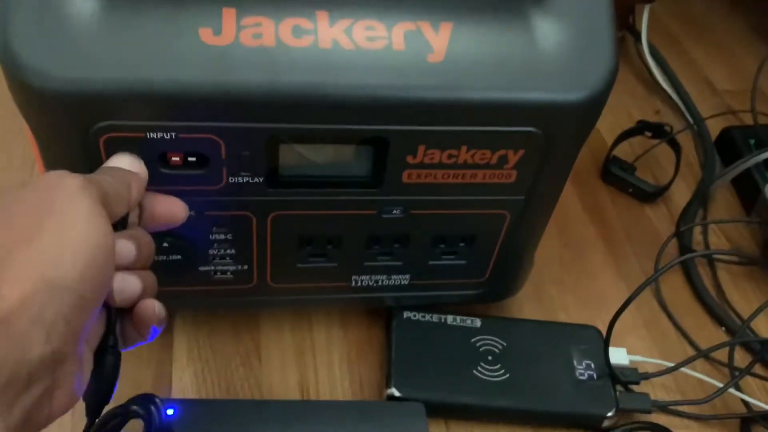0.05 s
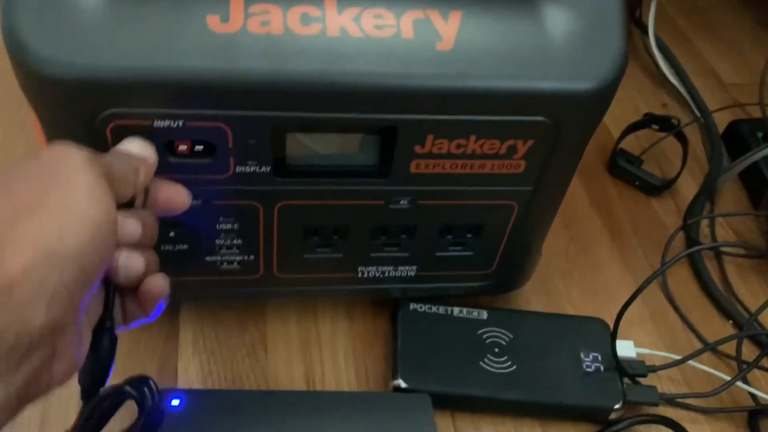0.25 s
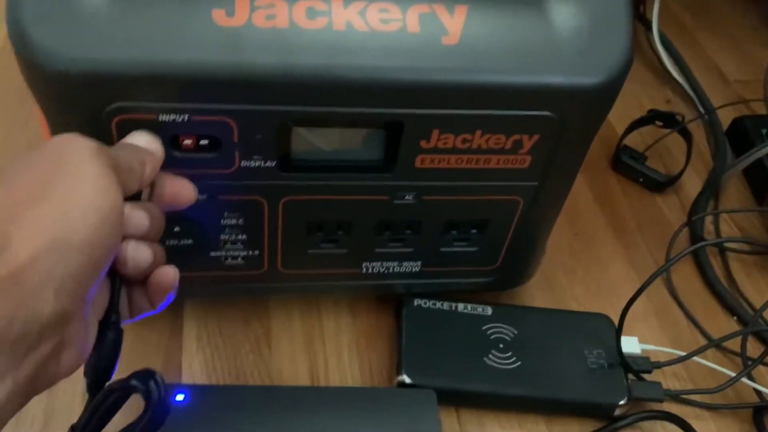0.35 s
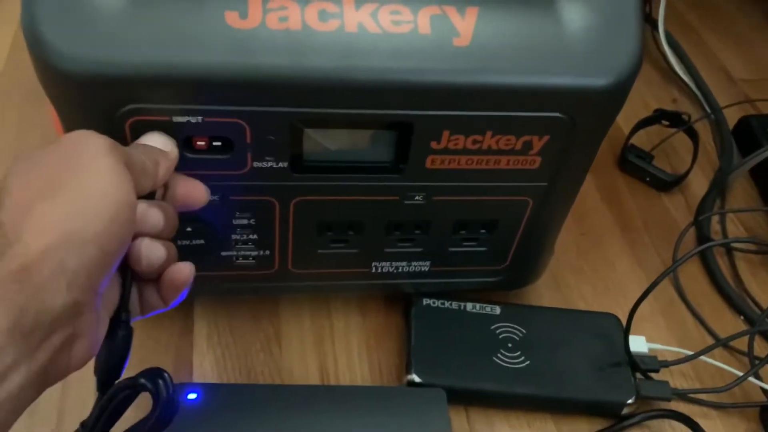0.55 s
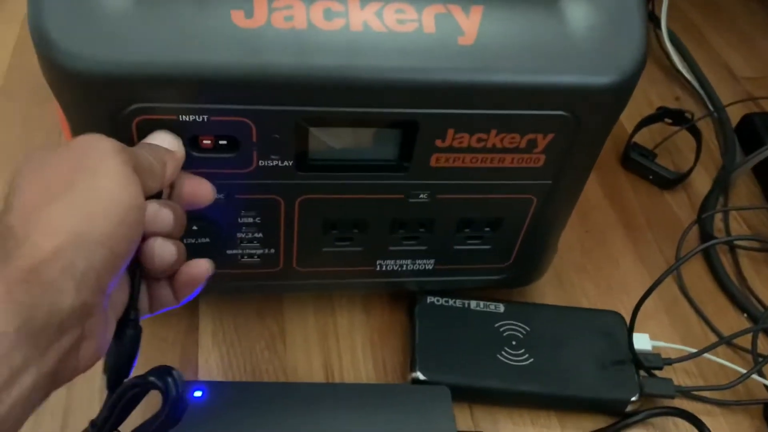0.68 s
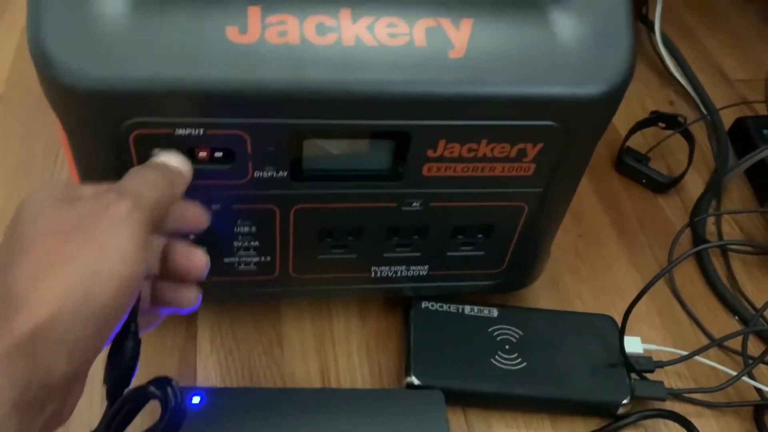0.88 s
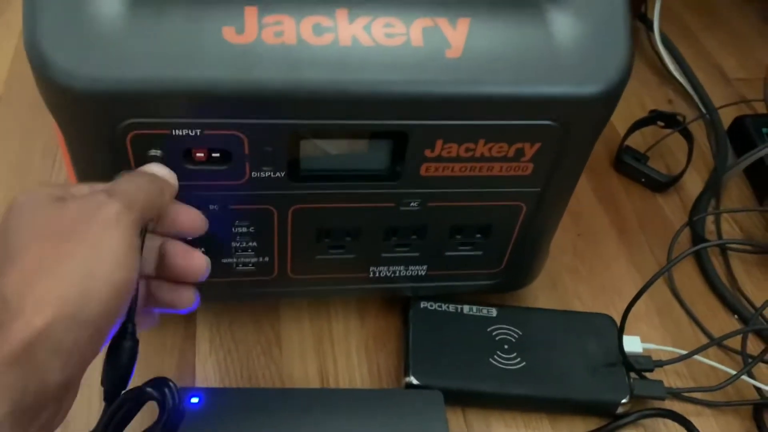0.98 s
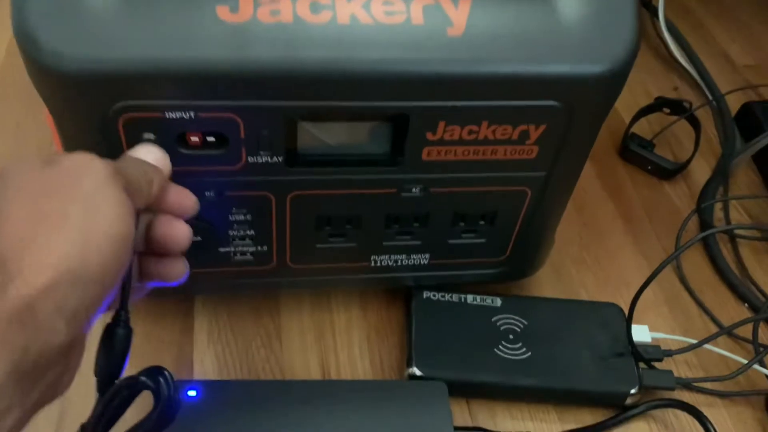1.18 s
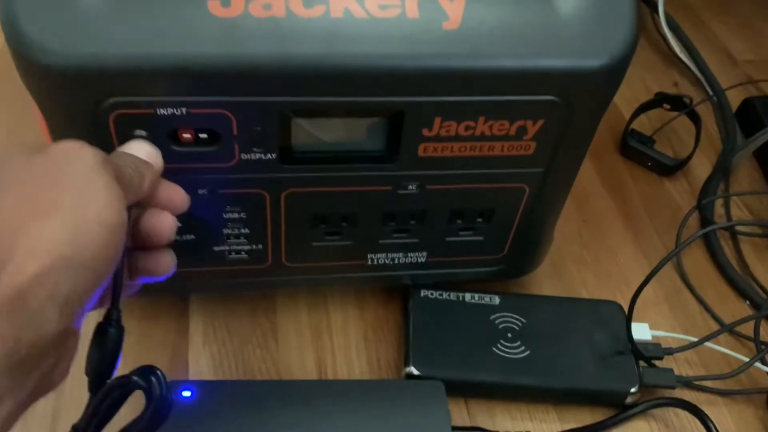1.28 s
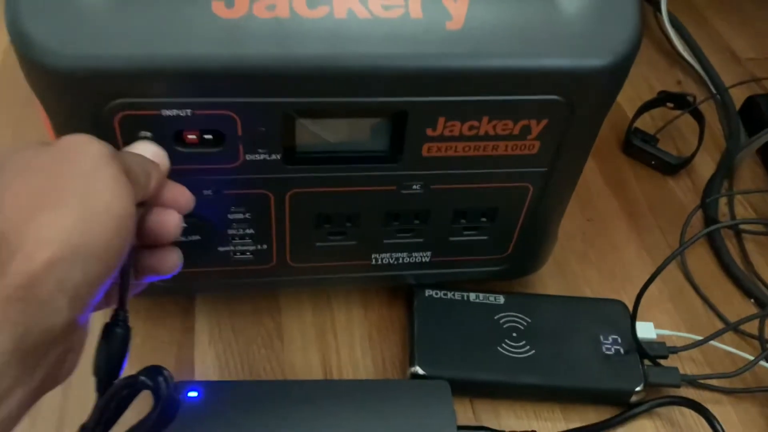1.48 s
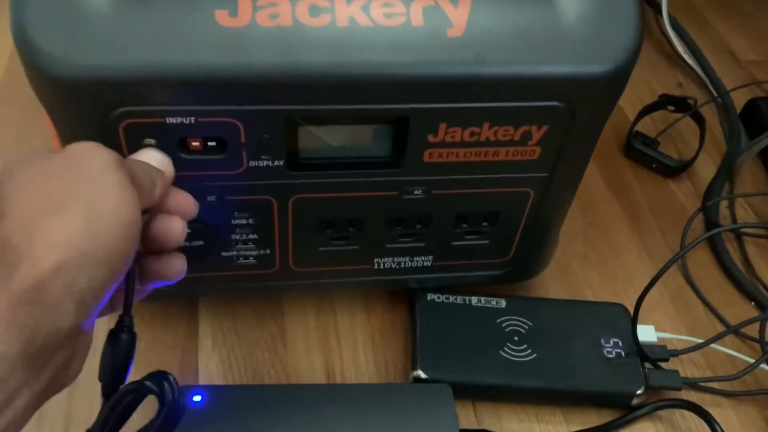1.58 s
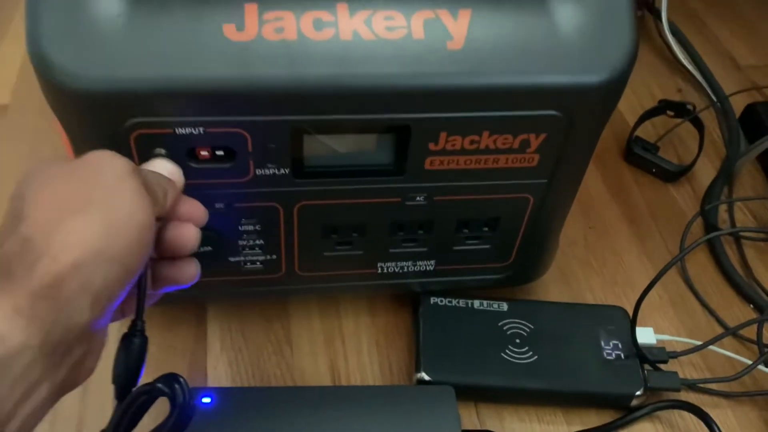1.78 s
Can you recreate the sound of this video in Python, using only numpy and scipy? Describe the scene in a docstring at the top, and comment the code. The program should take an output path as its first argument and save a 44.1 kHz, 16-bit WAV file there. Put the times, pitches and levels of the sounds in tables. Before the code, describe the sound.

Two quick clicks as a charging plug is pushed into a hollow plastic power unit indoors

```python
"""On the wooden floor of a small room, a charging plug is pushed into the socket of a portable power station.
It scrapes in as a run of tiny catches, snaps past the contact spring and seats with a second click (noise bursts).
The metal barrel pings and the hollow plastic case knocks and rings (sets of fading sine tones).
Then the fingers shift on the plug with faint ticks, rubs, taps and bumps (shaped noise and short tones).
A small room echo and a low rumble with faint hiss lie around it all."""
import sys
import numpy as np
from scipy import signal
from scipy.fft import rfft, irfft
from scipy.io import wavfile

SR = 44100
rng = np.random.default_rng(int(sys.argv[2]) if len(sys.argv) > 2 else 0)


def output_pcm(signal):
    """Save a mono or channel-first signal as 16-bit PCM at the path in sys.argv[1].

    Samples are clipped to [-1, 1] before scaling.
    """
    pcm = np.clip(np.atleast_2d(signal).T, -1, 1) * 32767
    wavfile.write(sys.argv[1], SR, np.round(pcm).astype(np.int16))


N = 81585
T = np.arange(N) / SR  # time of each sample in seconds
DIFFUSE_HZ = 1107  # above this pitch the two sides are fully out of step
SNAP_ATTACK_S = 0.0021  # rise of the snap and of the barrel's ping

# A t60 is the time in which a sound falls by 60 dB.
# The plug's two clicks: start_s, snap_db, panel_ring_db
CLICKS = [(0.2128, -34.5, -39.5), (0.2303, -45.5, -51)]


def amp(db):
    """Turn decibels into a gain."""
    return 10 ** (np.asarray(db) / 20)


def on_log(hz, points, axis=1):
    """Read a table column at any pitch, on straight lines along log frequency."""
    table = np.array(points, float)
    return np.interp(np.log(hz + 1e-9), np.log(table[:, 0]), table[:, axis])


def colour(x, points):
    """Filter a sound to a spectrum of (pitch_hz, level_db) points, then bring it to rms 1."""
    gain = amp(on_log(np.fft.rfftfreq(N, 1 / SR), points))
    y = irfft(rfft(x) * gain, N)
    return y / y.std()


def noise(points, wide_hz):
    """Coloured stereo noise: nearly alike on both sides in the bass, fully wide above wide_hz."""
    mid, side = rng.standard_normal((2, N))
    width = np.clip(np.fft.rfftfreq(N, 1 / SR) / wide_hz, .15, 1)
    side = irfft(rfft(side) * width, N)
    return colour(np.array([mid + side, mid - side]), points)


def fade(start, attack, t60):
    """A short straight rise times an exponential decay, as in a struck object losing its energy."""
    age = np.maximum(T - start, 0)
    rise = np.minimum(age / attack, 1)
    return rise * np.exp(-np.log(1000) * age / t60)


def ring(start, hz, t60, attack, pan_db=0):
    """One struck mode, a fading sine; higher modes reach the two sides more out of step."""
    skew = min((hz / DIFFUSE_HZ) ** 2, 1) * rng.choice([-1, 1]) * rng.uniform(0.58, 1)  # radians
    sides = np.array([[1], [-1]])  # left, right
    wave = np.sin(2 * np.pi * hz * (T - start) + sides * skew)
    return amp(sides * pan_db / 2) * wave * fade(start, attack, t60)


def snaps():
    """The contact spring lets go with a bright crack: a quick noise burst with a weaker, longer tail."""
    # Colour of the snap: pitch_hz, level_db
    snap_colour = [(300, 15.5), (600, 6), (1300, 5.5), (1650, -1), (2200, 4), (2900, 2), (3450, -1),
                   (4200, -0.5), (5300, -14), (7000, -10.5), (8500, -14.5), (11300, -19.5), (13200, -18),
                   (15500, -23)]
    snap_t60_s, tail_t60_s, tail_db = .018, 0.099, -7  # tail level is against the snap
    left_lag_s, diffuse_db = .0002, -6.5  # the left side hears the snap later
    out = 0
    for start, db, _ in CLICKS:
        tail = amp(tail_db) * fade(start, SNAP_ATTACK_S, tail_t60_s)
        shape = fade(start, SNAP_ATTACK_S, snap_t60_s) + tail
        direct = colour(rng.standard_normal(N), snap_colour)
        crack = np.array([np.roll(direct, int(left_lag_s * SR)), direct])
        crack = crack + amp(diffuse_db) * noise(snap_colour, DIFFUSE_HZ)
        out = out + amp(db) * shape * crack
    return out


def scrape():
    """The tip rings the socket rim and the barrel slides in with dense little catches of noise."""
    # Colour of the barrel sliding in: pitch_hz, level_db
    scrape_colour = [(120, -15), (300, 16), (420, 2), (600, 15), (900, -17.5), (1200, -10.5), (1430, -6.5),
                     (1800, -14.5), (3500, -15), (5500, -34), (15000, -36)]
    # Modes of the socket rim as the plug's tip meets it: pitch_hz, level_db, t60_s
    rim_modes = [(560, 0, .09), (640, -2, .08), (1430, 0, .06)]
    start_s, ramp_s, fade_from_s = 0.172, 0.026, .209  # the ramp serves the rise and the fall
    scrape_db, catches_per_s, catch_t60_s = -52.5, 1300, 0.026
    rim_s, rim_db, rim_attack_s = .180, -48, 0.013

    # Catches fall at random times with random strengths; each one starts the same grain of noise.
    catches = (rng.random(N) < catches_per_s / SR) * rng.standard_normal(N)
    grain = noise(scrape_colour, DIFFUSE_HZ) * fade(0, 0.00025, catch_t60_s)
    rough = signal.fftconvolve(catches[None], grain, axes=1)[:, :N]
    rise = np.clip((T - start_s) / ramp_s, 0, 1)
    fall = np.clip((fade_from_s - T) / ramp_s + 1, 0, 1)
    sliding = rise * fall
    rim = sum(amp(db) * ring(rim_s, hz, t60, rim_attack_s) for hz, db, t60 in rim_modes)
    return amp(scrape_db) * sliding * rough / rough.std() + amp(rim_db) * rim


def knock(start):
    """The hollow case takes a push and its low modes ring together."""
    # Low modes of the hollow case: pitch_hz, level_db, t60_s
    case_modes = [(68, -22, .55), (129, -20, .55), (156, -16, .32), (227, -14, .3), (252, -15, .28),
                  (297, 1, .125), (302, -18, .36), (364, -16, .17), (436, -19, .22)]
    return sum(amp(db) * ring(start, hz, t60, .002) for hz, db, t60 in case_modes)


def case():
    """Each click pings the barrel and rings the panels; the landing plug knocks the hollow case."""
    # The plug lands on the case just after each click: start_s, level_db
    landings = [(0.2187, -23.3), (0.2355, -33.5)]
    # Brief modes of the metal barrel and its spring: pitch_hz, level_db, t60_s
    barrel_modes = [(2950, 0, .022), (3950, 1, .028), (4237, 2, .03), (6780, -18, .05), (7190, -17, .05),
                    (10450, -22, .05), (11500, -17, .05), (12320, -23, .05)]
    # Modes of the plastic panels: pitch_hz, level_db, t60_s, left_minus_right_db
    panel_modes = [(499, -10, .17, 4), (601, -2, .17, -3), (665, -2, .13, -2), (790, -8, .16, 7),
                   (941, -1, .18, 1), (989, 1, .11, 4), (1214, -4, .14, 4), (1345, -4, .14, 1),
                   (1785, -14, .15, 0), (2082, -4, .11, -6), (2324, -3, .12, 1), (2766, -4, .12, -3),
                   (3130, -11, .1, -2), (3924, -8, .08, -3)]
    entry_s, entry_db = .1862, -45.5  # light knock on the case as the plug enters
    barrel_db, panel_attack_s = -5.5, 0.0048  # barrel level is against the snap
    out = amp(entry_db) * knock(entry_s)
    out = out + sum(amp(db) * knock(start) for start, db in landings)
    for start, snap_db, panel_db in CLICKS:
        ping = sum(amp(db) * ring(start, hz, t60, SNAP_ATTACK_S) for hz, db, t60 in barrel_modes)
        panels = sum(amp(db) * ring(start, hz, t60, panel_attack_s, pan_db)
                     for hz, db, t60, pan_db in panel_modes)
        out = out + amp(snap_db + barrel_db) * ping + amp(panel_db) * panels
    return out


def rocking():
    """The seated plug rocks in its socket with two small dry taps, each a set of short modes."""
    # The two taps: start_s, level_db, lowest_mode_extra_db
    rocks = [(0.931, -74.5, -6), (0.9713, -61, 2.5)]
    # Modes of the plug: pitch_hz, level_db, t60_s
    plug_modes = [(880, 0, .028), (2550, 1, .018), (2780, -1, .018), (3020, -7, .075)]
    out = 0
    for start, db, lowest_db in rocks:
        for k, (hz, mode_db, t60) in enumerate(plug_modes):
            level_db = db + mode_db + lowest_db * (k == 0)
            out = out + amp(level_db) * ring(start, hz, t60, 0.00084)
    return out


def grip():
    """Fingers tick (short noise around one pitch) and rub (soft swells of noise) on the plastic."""
    # Tiny ticks: start_s, level_db, brightest_hz
    ticks = [(0.4614, -71, 11100), (0.471, -74, 6700), (0.524, -70.5, 11000), (0.564, -65, 11600),
             (0.795, -70, 3140), (0.818, -68.5, 7100), (0.8225, -66.5, 2000), (1.3224, -75, 5000),
             (1.366, -73.5, 1330)]
    # Rubs on the plastic: middle_s, width_s, level_db, tilt_db_per_octave (above 500 Hz)
    rubs = [(0.736, 0.024, -75.5, 8.5), (0.828, 0.014, -74.5, -11.5)]
    skirt_db, tick_t60_s = -6, 0.015  # skirt: change per octave away from the brightest pitch
    out = 0
    for start, db, hz in ticks:
        hump = [(hz / 8, 3 * skirt_db), (hz, 0), (hz * 8, 3 * skirt_db)]  # 3 octaves each way
        out = out + amp(db) * fade(start, 0.00057, tick_t60_s) * noise(hump, DIFFUSE_HZ)
    for middle, width, db, tilt in rubs:
        skin = [(100, -30), (500, 0), (16000, tilt * np.log2(16000 / 500))]
        swell = np.exp(-.5 * ((T - middle) / width) ** 2)
        out = out + amp(db) * swell * noise(skin, DIFFUSE_HZ)
    return out


def bumps():
    """Dull thuds of the hand through case and floor, as fading noise; a longer push is duller."""
    # Soft bumps of the hand: start_s, level_db, push_length_s
    pushes = [(0.0, -43.5, 0.0046), (0.149, -58, 0.014), (0.238, -46, 0.0043), (0.338, -44.5, 0.006),
              (0.541, -52, 0.0074), (0.733, -60.5, 0.00056), (0.825, -58.5, 0.0008), (0.974, -61.5, 0.0012),
              (1.094, -57.5, 0.024), (1.274, -52, 0.015), (1.323, -57, 0.0076)]
    # Colour of a bump before dulling: pitch_hz, level_db
    bump_colour = [(30, -15), (70, 1), (170, -0.5), (300, -4), (480, -20), (1000, -25), (3000, -33)]
    attack_s, t60_s = 0.0036, 0.17
    out = 0
    for start, db, push in pushes:
        dulled = [(hz, level - 10 * np.log10(1 + (hz * push * 2) ** 2)) for hz, level in bump_colour]
        out = out + amp(db) * fade(start, attack_s, t60_s) * noise(dulled, DIFFUSE_HZ)
    return out


def room(x):
    """Diffuse echo: fading noise in overlapping octave bands; the highest treble dies soonest."""
    # Room echo: pitch_hz, level_db, t60_s
    echo = [(70.2, 1, 0.31), (147, -4.5, 0.2), (286, -2.5, .34), (560, 3, 0.23), (1200, 0, 0.22),
            (2740, -3, 0.24), (5000, -7.5, 0.18), (12000, -17, 0.084)]
    rise_s = 0.0042  # the echo starts this late and takes as long to rise
    hz = np.fft.rfftfreq(N, 1 / SR)
    spread = rfft(noise([(20, 0), (20000, 0.0015)], DIFFUSE_HZ))  # nearly flat noise
    tail = 0
    for centre in 62.5 * 2 ** np.arange(9):
        band = np.maximum(1 - abs(np.log2((hz + 1) / centre)), 0)
        shape = fade(rise_s, rise_s, on_log(centre, echo, axis=2))
        shape = shape / np.sqrt(np.sum(shape ** 2))  # equal energy for any decay time
        tail = tail + amp(on_log(centre, echo)) * irfft(spread * band, N) * shape
    return signal.fftconvolve(x, tail, axes=1)[:, :N]


def air():
    """Low room rumble under a steady faint hiss, all from one coloured noise."""
    # Colour of room air and rumble: pitch_hz, level_db
    air_colour = [(20, -19), (31, -9.5), (45, 1), (70, 7), (105, -4.5), (160, -1.5), (230, -17),
                  (400, -20.5), (700, -28), (1500, -34), (4000, -37), (7400, -43.5), (11000, -38.5),
                  (15500, -45)]
    air_db, wide_hz = -66, 775
    return amp(air_db) * noise(air_colour, wide_hz)


def scene():
    """Plug and hand in the room; the case feeds the echo less than the contact sounds do."""
    contact = snaps() + scrape() + grip()
    body = case() + rocking()
    case_echo_db = -12.5
    echo = room(contact + amp(case_echo_db) * body)
    return contact + body + echo + bumps() + air()


def record(dry):
    """The recorder cuts the deepest bass gently and the top treble steeply."""
    low_cut_hz, top_hz = 35, 15800
    low_cut = signal.butter(2, low_cut_hz, "high", fs=SR, output="sos")
    top_cut = signal.ellip(8, .2, 70, top_hz, fs=SR, output="sos")
    return signal.sosfilt(top_cut, signal.sosfilt(low_cut, dry))


dry = scene()
out = record(dry)
output_pcm(out)
```